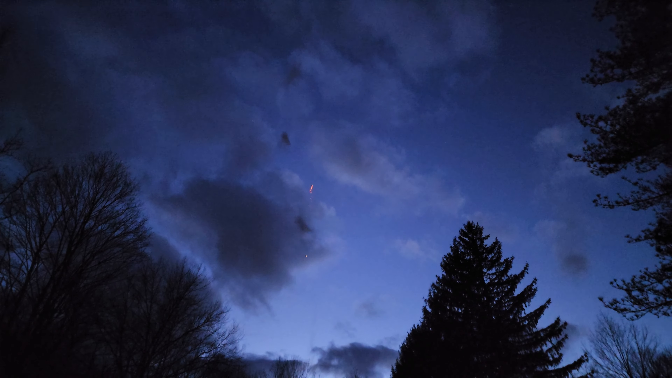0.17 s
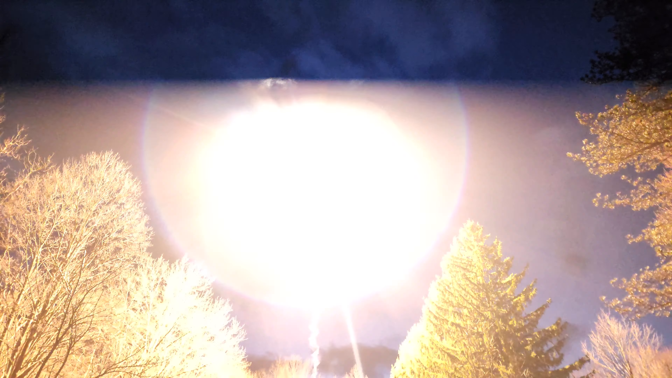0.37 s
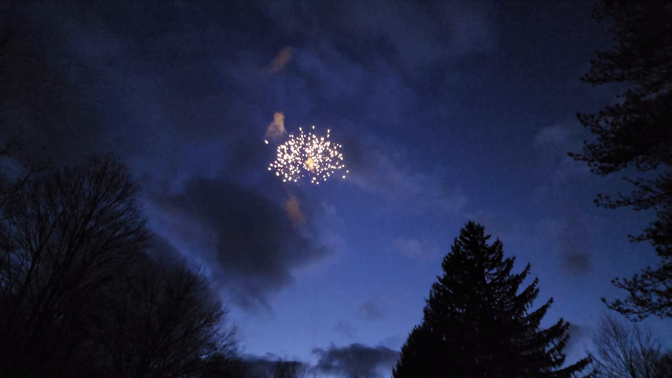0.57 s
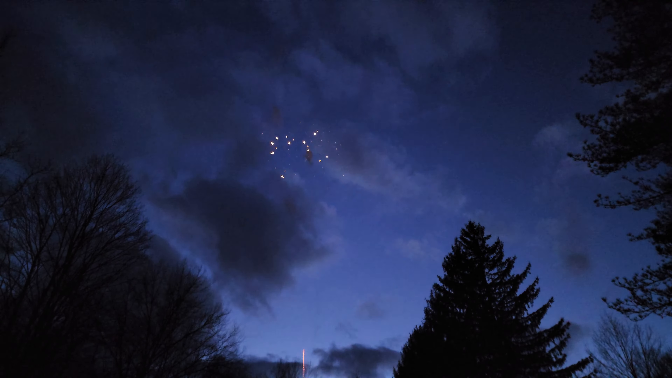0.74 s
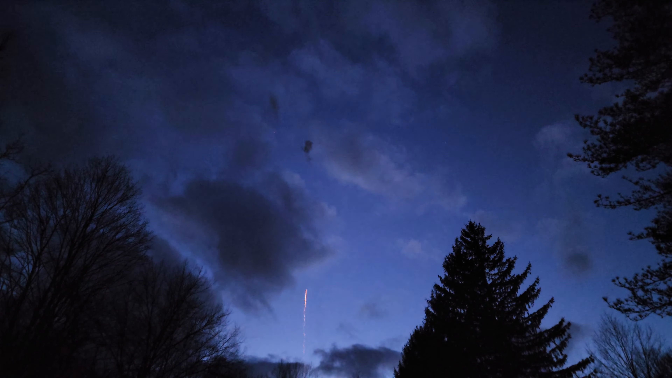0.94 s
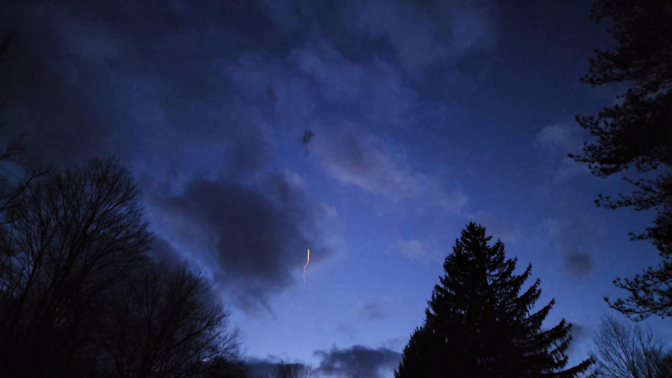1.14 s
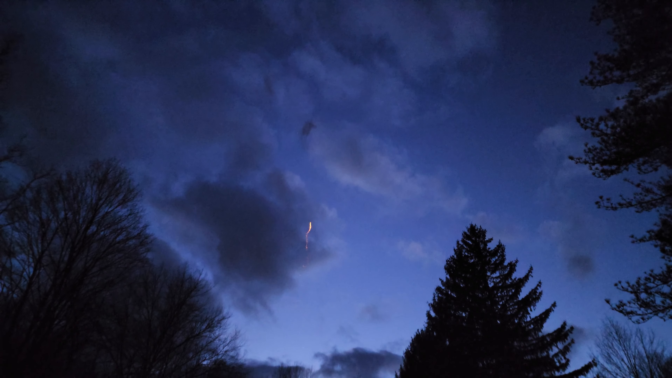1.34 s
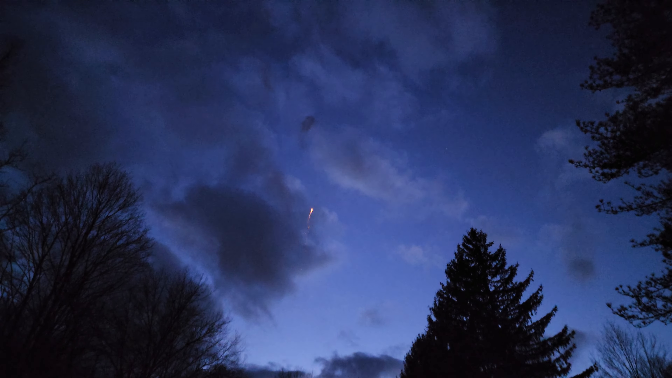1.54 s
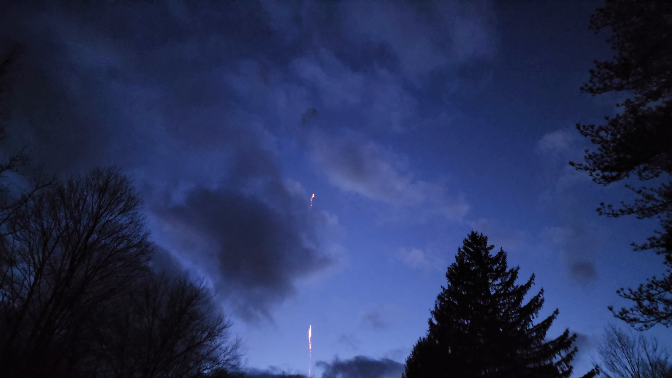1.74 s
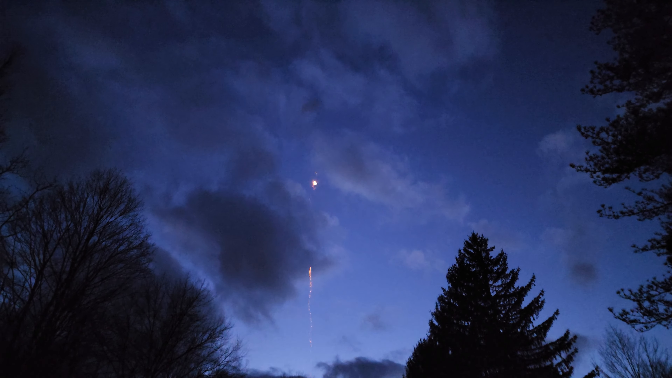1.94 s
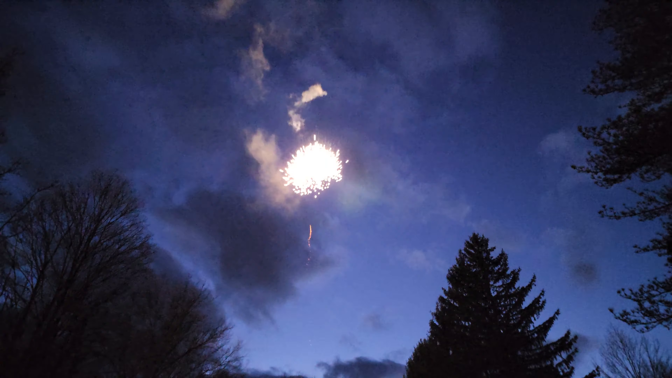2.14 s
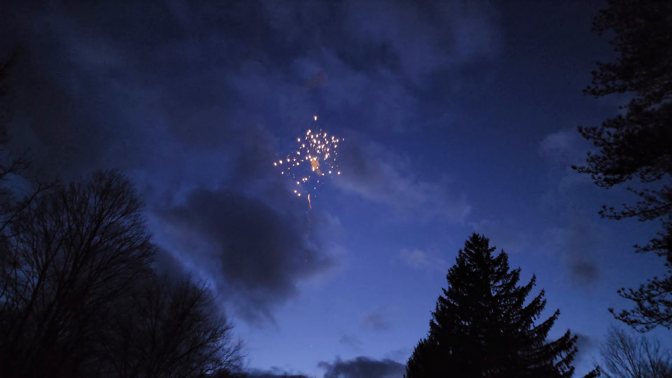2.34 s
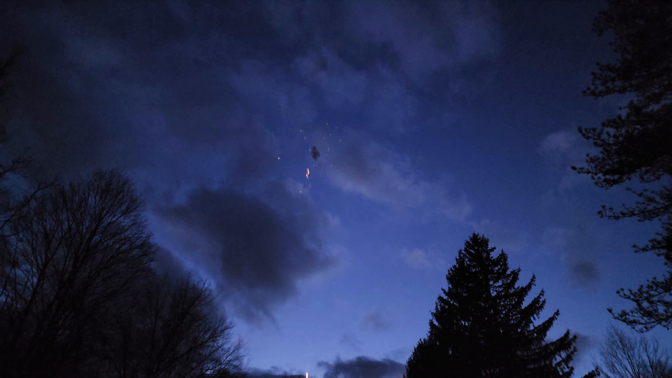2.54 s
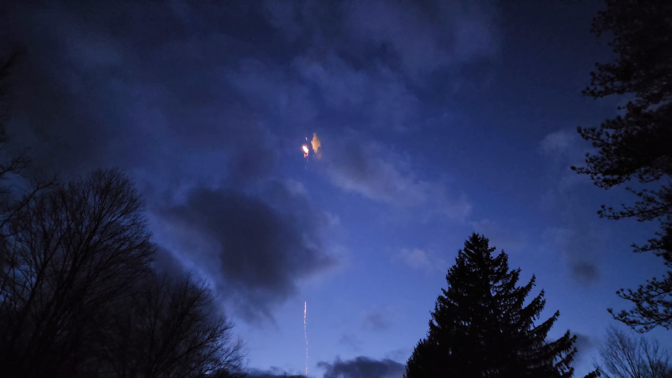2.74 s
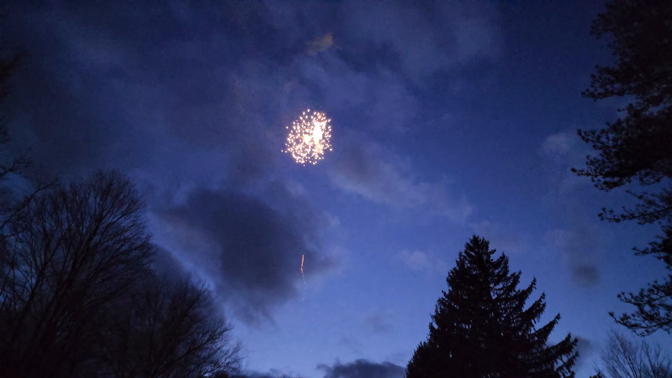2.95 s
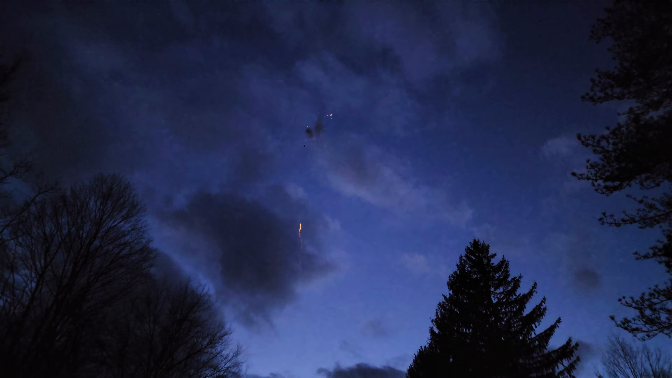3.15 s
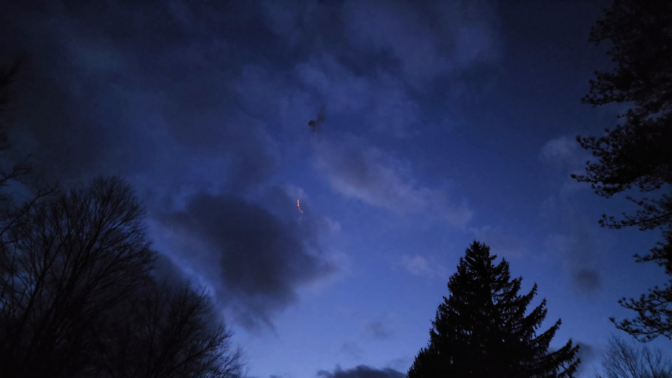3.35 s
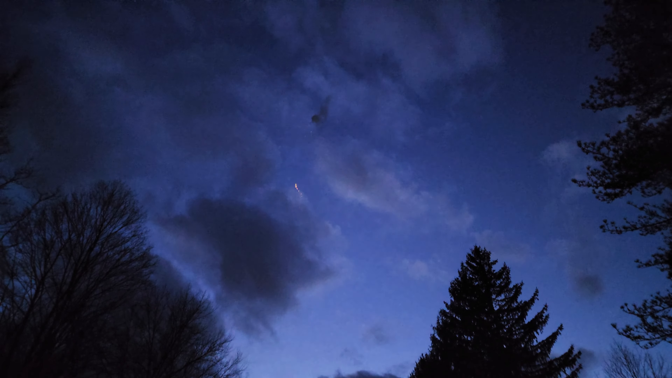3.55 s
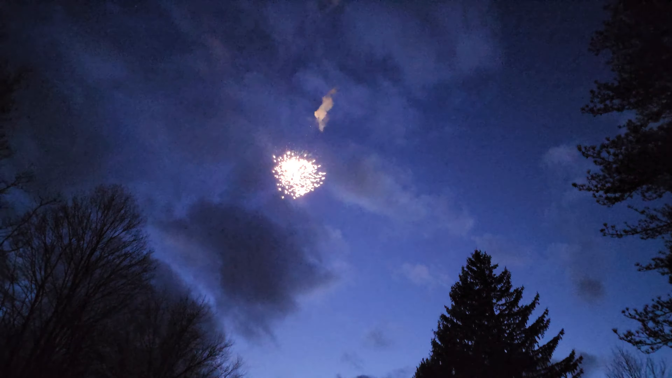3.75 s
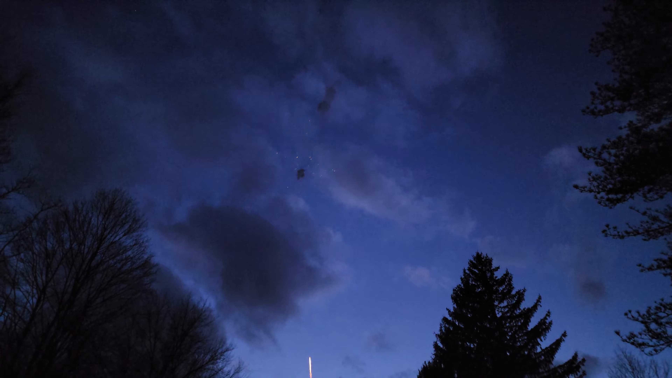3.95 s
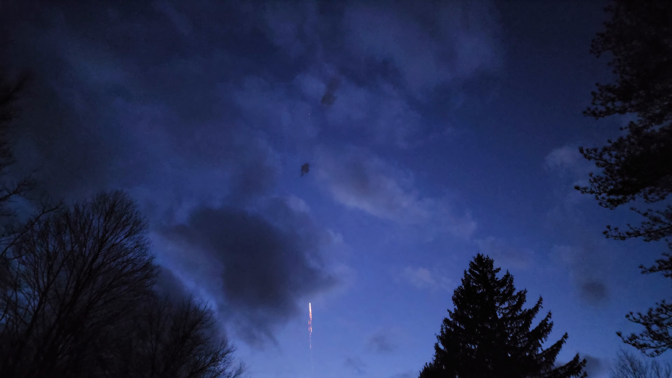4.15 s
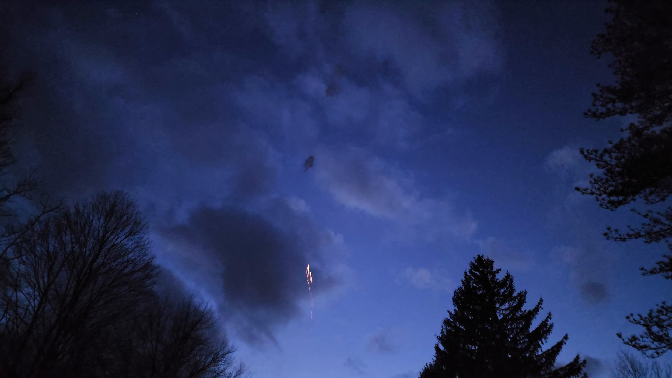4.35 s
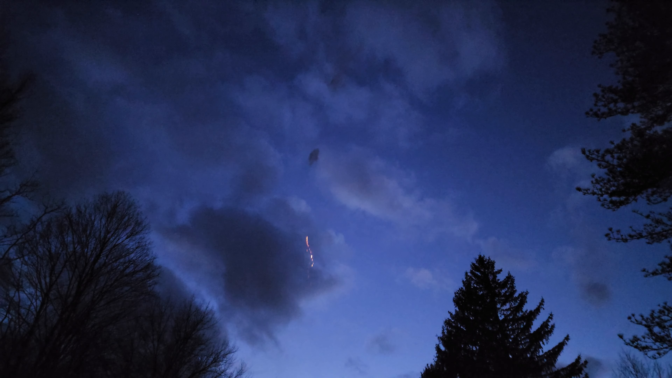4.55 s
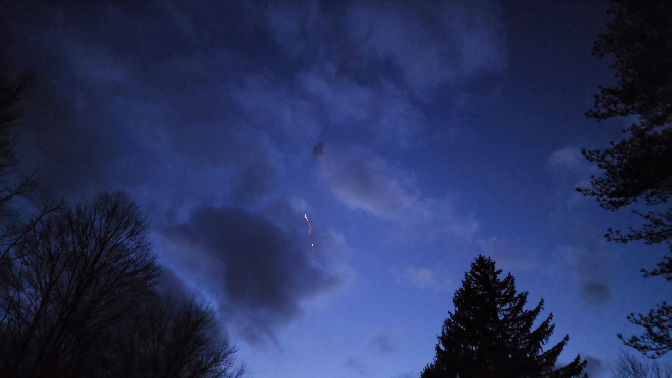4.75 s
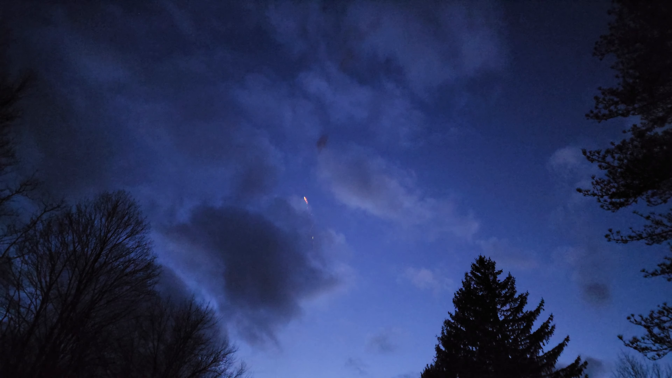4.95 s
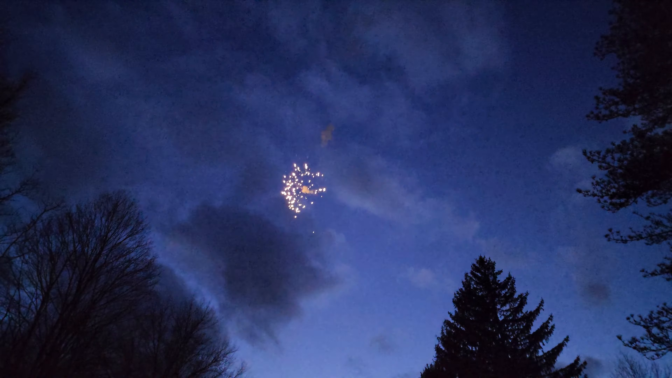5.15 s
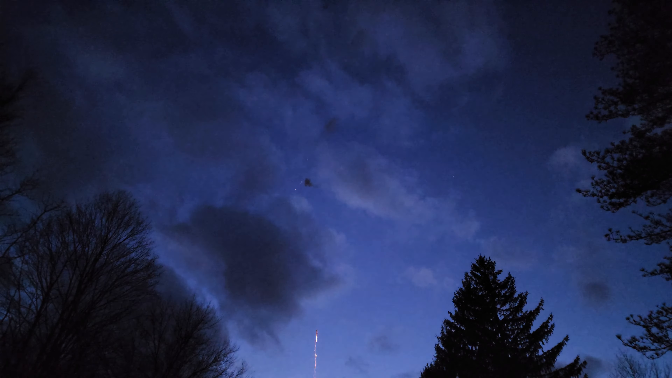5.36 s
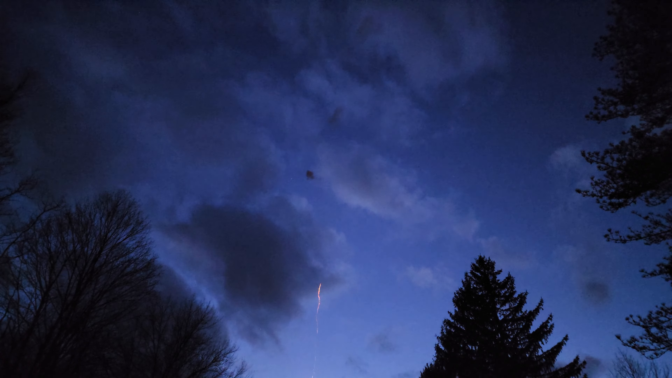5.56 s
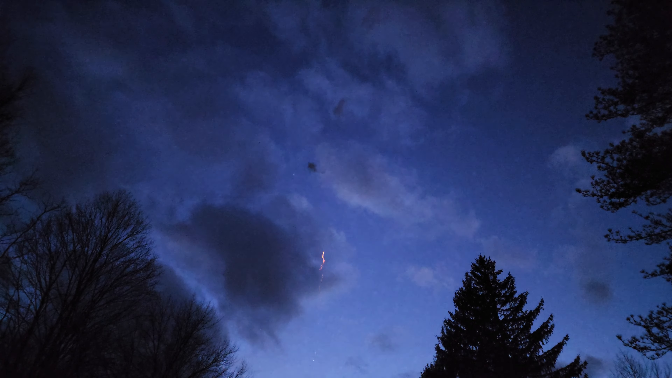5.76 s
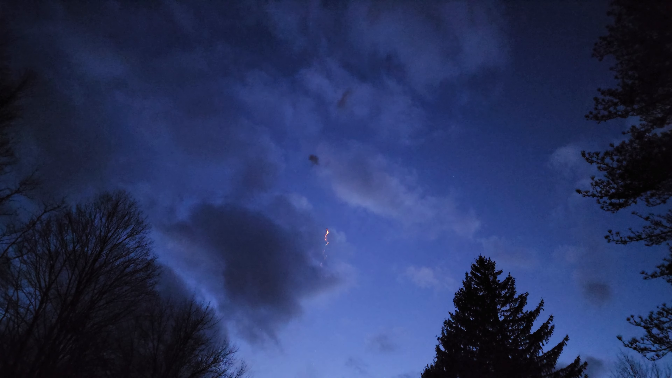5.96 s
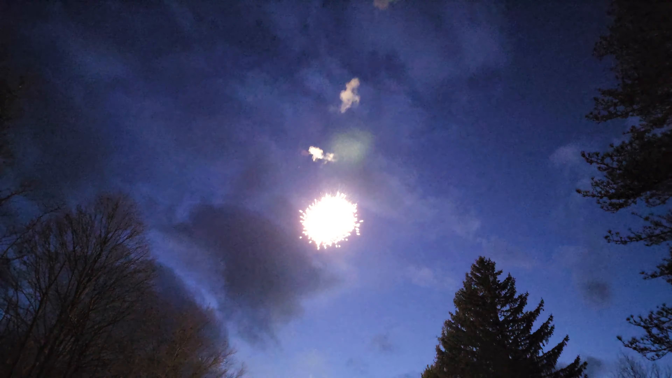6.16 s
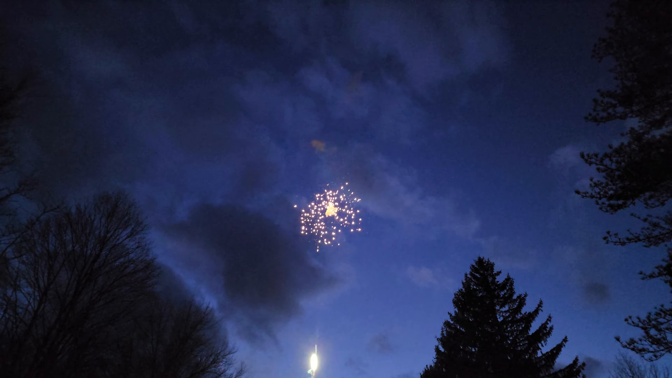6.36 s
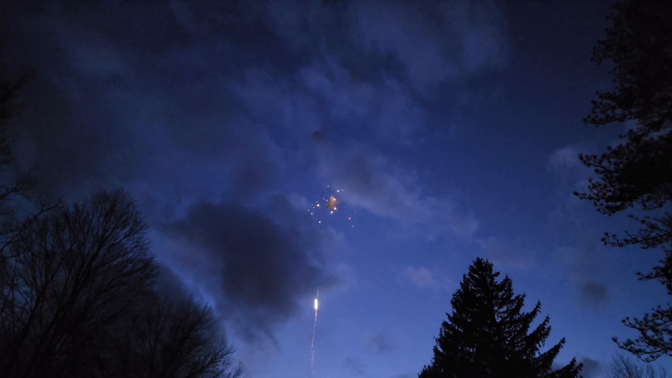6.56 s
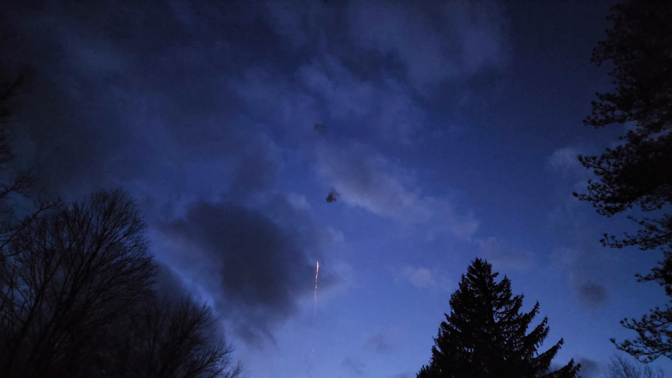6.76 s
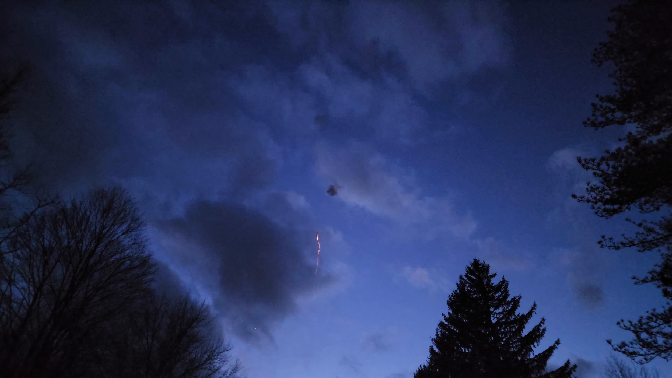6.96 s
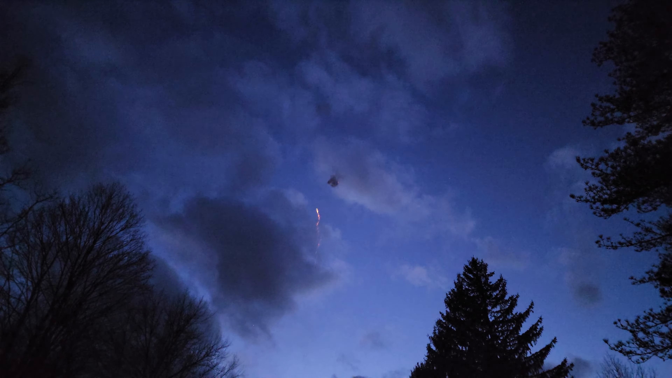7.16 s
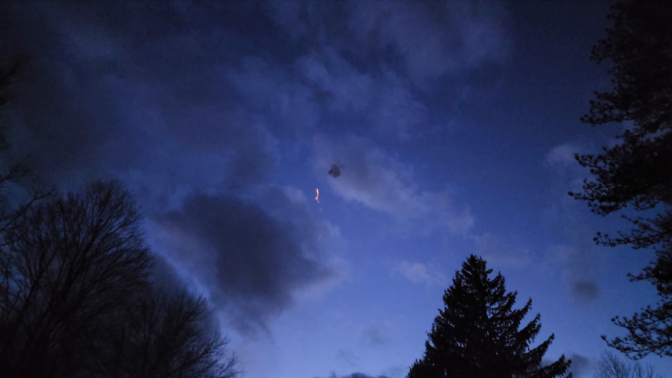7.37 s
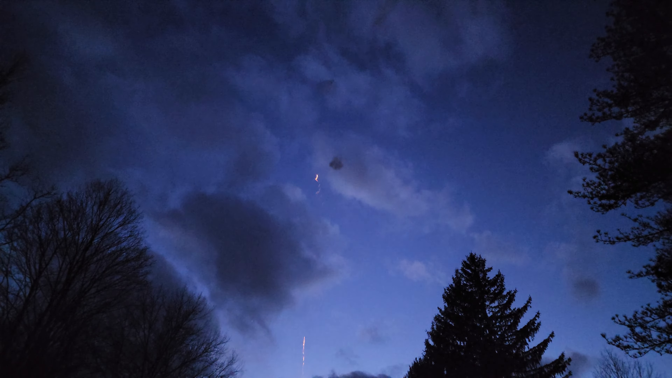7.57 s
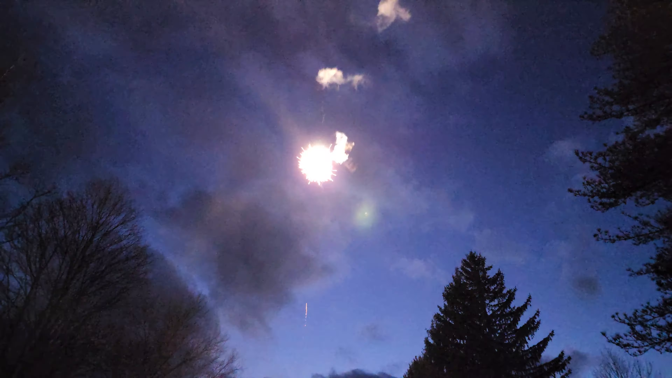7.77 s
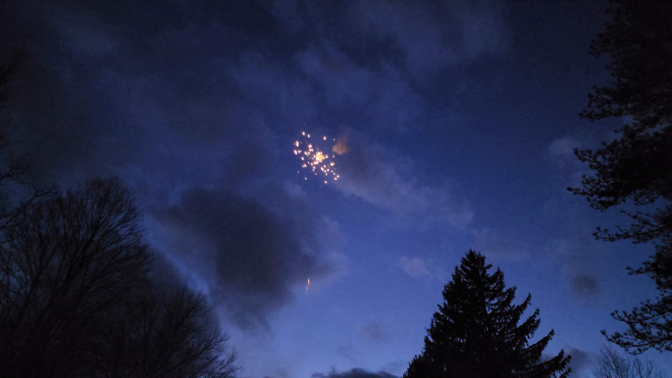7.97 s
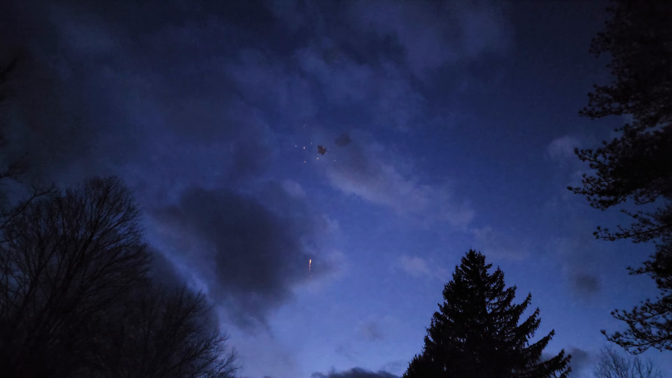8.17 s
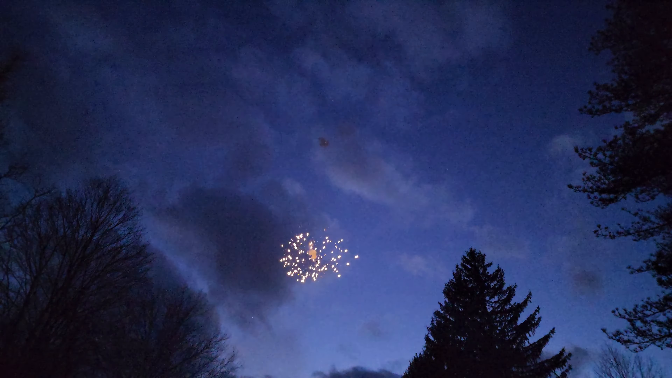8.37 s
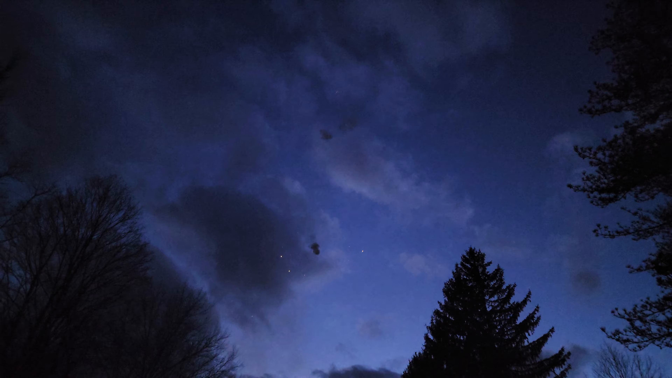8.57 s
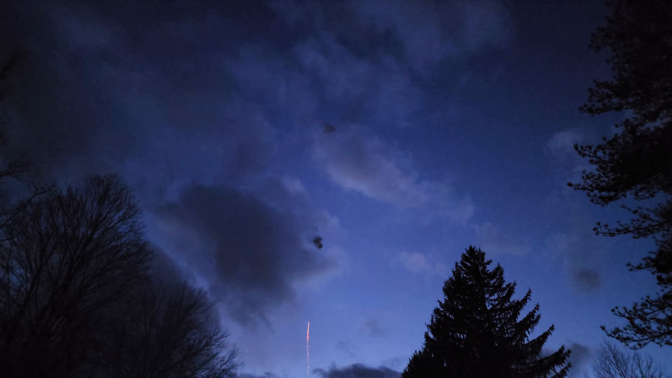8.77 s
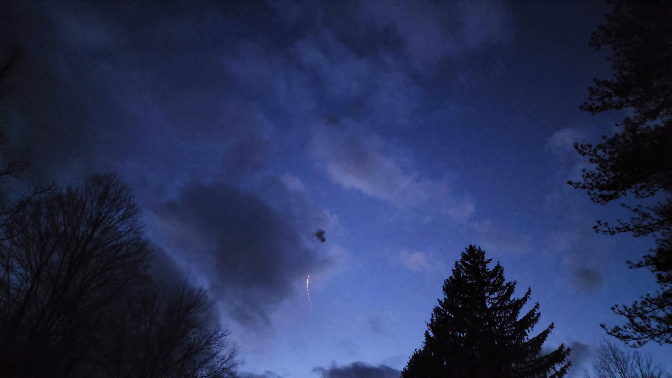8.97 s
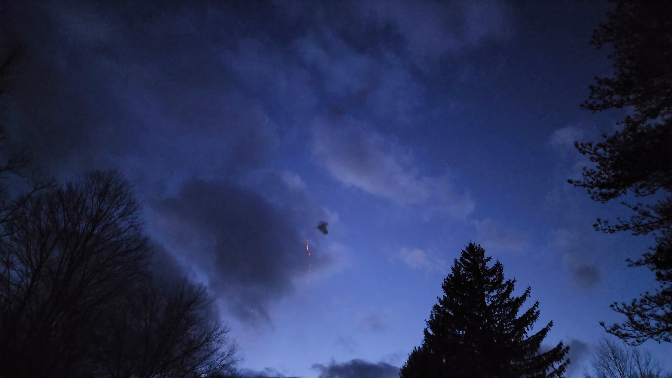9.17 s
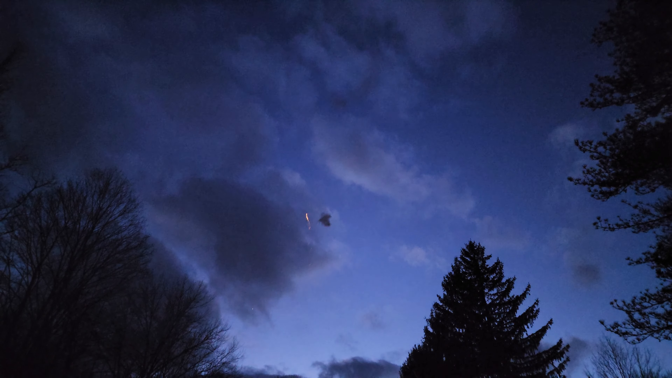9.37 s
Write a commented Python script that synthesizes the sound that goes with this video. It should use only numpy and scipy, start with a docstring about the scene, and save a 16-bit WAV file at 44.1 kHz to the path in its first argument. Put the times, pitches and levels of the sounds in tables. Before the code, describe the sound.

Fireworks burst outdoors in an uneven run of loud, cracking bangs, with hollow tube pops between them and rolling woodland echoes.

```python
"""A firework cake fires shell after shell in a wooded yard at dusk.
At first an earlier bang is still echoing. Then each shell leaves its tube with a hollow pop.
A moment later it bursts overhead: the sharp wave of air and its bounce off the ground overload
the microphone. Next the nearby trees scatter the shot back as a short rush of noise,
and last the woods hiss and the hills rumble on behind it."""
import sys
import numpy as np
from scipy import signal
from scipy.fft import rfft, irfft, next_fast_len
from scipy.io import wavfile
from scipy.ndimage import uniform_filter1d

SR = 44100
rng = np.random.default_rng(int(sys.argv[2]) if len(sys.argv) > 2 else 0)


def pcm_store(signal):
    """Save signal as 16-bit PCM."""
    levels = np.round(np.clip(np.atleast_2d(signal), -1, 1) * 32767)
    wavfile.write(sys.argv[1], SR, levels.astype(np.int16).T)


N = 415863
TIME = np.arange(N) / SR
STEP = 64   # samples between updates of slowly changing levels
CUTOFF_HZ = 16000
RIGHT_LAG_S = .00005   # the right side hears each shot this much later

# steady hush of the evening air: f/Hz, level/(dB per Hz)
EVENING_AIR = [(25, -101), (50, -89.5), (90, -74), (200, -73.5), (500, -84.5), (1400, -90), (2000, -93.5),
               (2700, -112), (4500, -119), (8000, -137), (16000, -142)]
# tone of the far rumble off the hills: f/Hz, level/(dB per Hz)
HILL_TONE = [(25, -89), (50, -75.5), (100, -66), (170, -60.5), (300, -67), (600, -108.5), (2000, -130)]
# tone of the echo from the trees: f/Hz, level/(dB per Hz)
TREE_TONE = [(30, -80.5), (100, -71), (200, -56.5), (370, -58.5), (700, -67), (1500, -70.5), (2050, -72.5),
             (2600, -83.5), (4400, -76), (6500, -83), (8500, -82), (10000, -91), (12000, -84),
             (16000, -94.5)]
# how fast air and leaves soak up an echo: f/Hz, loss/(dB per s)
AIR_AND_LEAF_LOSS = [(100, 1), (350, 5.5), (1500, -2), (2700, 10), (4300, 19.5), (7000, 50), (12000, 63)]
# tone of a launch's echo next to that of a burst: f/Hz, level/dB
LAUNCH_ECHO_TONE = [(100, -10), (300, -11), (600, -4), (1500, 0), (2700, -1), (4500, -1), (8000, -6),
                    (12000, -5.5)]
# how alike the echoes are in the left and right channels: f/Hz, likeness (-1 to 1)
STEREO_LIKENESS = [(60, 0.98), (130, 0.97), (290, 0.87), (640, 0.097), (1400, -0.2), (3000, 0.11),
                   (7000, -0.054)]
# the notes an empty tube rings at: f/Hz, Q (higher rings longer), level/dB
TUBE_NOTES = [(602, 2.88, 0), (1184, 4.4, -11.5), (1900, 7.4, -14.5)]
# ringing of the gas jet at the tube's mouth: f/Hz, Q, level/dB
JET_NOTES = [(4800, 4, -2), (7700, 5, 4), (12500, 3, 0)]
# charges that push the shells out of their tubes: t/s, pop level/dB, crack level/dB
LAUNCHES = [(0.5568, 7.5, -4), (1.475, 7, -6), (2.3927, 6.5, -7), (3.6596, 7.5, -8.5), (4.9899, 11.5, -4),
            (6.0736, 9, -5), (7.0118, 2.5, -18), (9.3252, 7.5, -4)]
# peaks and dips made by the microphone's sound holes: f/Hz, Q, level/dB
MIC_HOLES = [(1240, 0.86, 8.5), (2900, 6.2, 0.5), (4200, 1, 4.5), (8700, 3.8, 2.5), (10450, 11, -10.5),
             (11000, 2.5, 10)]
# shells bursting overhead: t/s, push length/ms, ground bounce delay/ms, bounce level/dB, echo level/dB
SHELL_BURSTS = [(-.55, 1.8, 5.2, 4, -0.5), (0.5845, 1.7, 5.5, 6.5, -2.5), (2.204, 1.22, 5.08, 7, 2.5),
                (2.9919, 1.75, 5.5, 3.5, -1), (3.8256, 1.8, 5.65, 7, -3), (5.1866, 1.7, 5.43, 3, 0),
                (6.2382, 2, 5.1, 4, -1.5), (7.9142, 2.43, 6.17, 3, 2.5), (8.3838, 1, 4.3, 7, -0.5)]


def from_db(db):
    """Turn decibels into a number to multiply a sound by."""
    return 10 ** (np.asarray(db) / 20)


def at_hz(points, hz):
    """Read between a table's rows, giving every octave the same room."""
    f, value = np.transpose(points)
    return np.interp(np.log(hz), np.log(f), value)


def delayed(x, s):
    """The same sound, s seconds later."""
    return np.pad(x, (int(round(s * SR)), 0))[:N]


def resonator(x, hz, q, high=0, band=0, low=0):
    """A filter that can ring: it mixes what lies above (high), around (band) and below (low) hz."""
    w = 2 * SR * np.tan(np.pi * hz / SR)
    b, a = signal.bilinear([high, band * w / q, low * w * w], [1, w / q, w * w], SR)
    return signal.lfilter(b, a, x + 1e-18)


def drift(rate_hz, size):
    """A smooth random wobble, typically of size 1, with one value every STEP samples."""
    r = np.exp(-2 * np.pi * rate_hz * STEP / SR)
    slow = signal.lfilter([1], [1, -2 * r, r * r], rng.standard_normal(2 * size))[size:]
    return slow / slow.std()


def echo_shape(age, db, rise_s, hold_s, fall):
    """An echo's power builds up, holds while the wave crosses the obstacles, then dies away."""
    age = np.maximum(age, 0)
    build_up = 1 - np.exp(-(age / rise_s) ** 2)
    return from_db(db) ** 2 * build_up / (1 + (age / hold_s) ** fall)


def tree_scatter(age, hz, branch_hz=390, edge_hz=810, edge_delay_s=.099, edge_width_s=.013):
    """Power the trees send back, age seconds after a shot: near branches, the wood's edge, its depths."""
    # thin branches let the low notes pass; the edge of the wood returns them as one dull slap
    branches = echo_shape(age, db=2.66, rise_s=.0058, hold_s=.094, fall=7.1) / (1 + (branch_hz / hz) ** 2)
    slap = np.exp(-((age - edge_delay_s) / edge_width_s) ** 2) * (age > 0)
    edge = from_db(2.5) ** 2 * slap / (1 + (hz / edge_hz) ** 2)
    depths = echo_shape(age, db=-4.5, rise_s=.026, hold_s=.42, fall=3.41)
    return branches + edge + depths


def echo_power(hz, t, launch_db=-10.5, launch_build_s=.03):
    """Power that trees and hills return from all the shots: a row per pitch, a column per moment."""
    def one_echo(age):
        """The echo of one shot, fading in air and leaves."""
        trees = from_db(at_hz(TREE_TONE, hz)) ** 2 * tree_scatter(age, hz)
        roll = echo_shape(age, db=-.5, rise_s=.18, hold_s=.93, fall=2.5)
        hills = from_db(at_hz(HILL_TONE, hz)) ** 2 * roll
        return (trees + hills) * from_db(-at_hz(AIR_AND_LEAF_LOSS, hz) * age) ** 2

    power = np.zeros((len(hz), len(t)))
    for s, *_, echo_db in SHELL_BURSTS:
        first = np.searchsorted(t, s)
        power[:, first:] += one_echo(t[first:] - s) * from_db(echo_db) ** 2
    for s, pop_db, crack_db in LAUNCHES:
        first = np.searchsorted(t, s)
        age = t[first:] - s
        gain = from_db(launch_db + (pop_db + crack_db) / 2 + at_hz(LAUNCH_ECHO_TONE, hz))
        build_up = 1 - np.exp(-age / launch_build_s)   # slower, because it starts on the ground
        power[:, first:] += one_echo(age) * (gain * build_up) ** 2
    return power


def woods(clump_db=.7, patchy_db=1.53, swell_db=2.5):
    """Countless small echoes blur into noise over the evening air; clumps of trees make it lumpy."""
    size, t = next_fast_len(N), TIME[::STEP]
    centres = np.geomspace(25, CUTOFF_HZ, 40)
    f = np.maximum(np.fft.rfftfreq(size, 1 / SR), 1)
    band_number = np.log(f / centres[0]) / np.log(centres[1] / centres[0])
    alike = np.clip(at_hz(STEREO_LIKENESS, f), -1, 1)
    shared, opposite = rfft(rng.standard_normal((2, size))) * np.sqrt(SR) / 2
    noise = np.sqrt(1 + alike) * shared + np.sqrt(1 - alike) * opposite * [[1], [-1]]
    clumps = clump_db * drift(78, len(t))
    swells = swell_db * drift(11.4, len(t))
    echoes = echo_power(centres[:, None], t)
    out = np.zeros((2, N))
    for k, hz in enumerate(centres):
        band = irfft(noise * np.maximum(1 - abs(band_number - k), 0), size)[:, :N]
        bass_swells = 2 * swells / (1 + hz / 300)
        lumps_db = clumps + patchy_db * drift(13, len(t)) + bass_swells
        power = echoes[k] * from_db(lumps_db) ** 2 + from_db(at_hz(EVENING_AIR, hz)) ** 2
        out += band * np.interp(TIME, t, np.sqrt(power))
    return out


def trunks(level_db=-5, spread_db=4, knock_hz=340, count=24):
    """Single big trunks throw back small, dull copies of each bang, each from its own side."""
    clicks = np.zeros((2, N))
    for s, *_, echo_db in SHELL_BURSTS:
        age = rng.uniform(.018, .63, count)
        side_lag_s = .0003 * rng.uniform(-1, 1, count)
        chance_db = spread_db * (2 * rng.random(count) - 2.5)
        gain = from_db(level_db + echo_db + chance_db) * np.sqrt(tree_scatter(age, knock_hz))
        for channel, sign in enumerate((1, -1)):
            at = ((s + age + sign * side_lag_s) * SR).astype(int)
            heard = (at >= 0) & (at < N)
            clicks[channel, at[heard]] += gain[heard]
    knocks = resonator(clicks, knock_hz, q=1.37, band=.93)
    return resonator(knocks, hz=2000, q=.9, low=.93)


def blast(s, push_ms, rise_ms):
    """An explosion's wave at s seconds: the air jumps, pushes briefly, then sucks back for longer."""
    out = np.zeros(N)
    near = slice(*np.searchsorted(TIME, [s, s + .03]))
    ms = (TIME[near] - s) * 1000
    out[near] = (1 - np.exp(-ms / rise_ms)) * (1 - ms / push_ms) * np.exp(-ms / push_ms)
    return out


def launches(right_db=2.4, jet_db=-18, wall_db=-22.5, wall_delay_s=.476):
    """A charge thumps the air in the tube, and gas cracks and spits out of its mouth."""
    push = sum(from_db(db) * blast(s, push_ms=1.3, rise_ms=.17) for s, db, _ in LAUNCHES)
    hollow = sum(from_db(db) * resonator(push, hz, q, band=q) for hz, q, db in TUBE_NOTES)
    hollow = from_db(-14) * resonator(hollow, hz=129, q=.46, high=.85)
    # the tube passes only its lowest notes, which leaves a gap below the bright snap
    hollow = signal.sosfilt(signal.butter(4, 1750, fs=SR, output="sos"), hollow)
    crack = sum(from_db(db) * blast(s, push_ms=.35, rise_ms=.03) for s, _, db in LAUNCHES)
    jet = from_db(jet_db) * resonator(abs(crack), hz=250, q=.32, low=4.1) * rng.standard_normal(N)
    snap = resonator(crack + jet, hz=4200, q=1.5, high=1)
    pop = hollow + sum(from_db(db) * resonator(snap, hz, q, band=.86) for hz, q, db in JET_NOTES)
    # a far wall returns each pop once, duller
    pop += from_db(wall_db) * delayed(resonator(pop, hz=2500, q=.7, low=.83), wall_delay_s)
    return np.array([pop, from_db(right_db) * delayed(pop, RIGHT_LAG_S)])


def mic_holes(x):
    """The microphone's sound holes ring at high pitches."""
    for hz, q, db in MIC_HOLES:
        x = resonator(x, hz, q * from_db(db / 2), high=.99, band=from_db(db), low=.95)
    return x


def bursts(shock_db=10, ceiling=1.704, ragged=.087, thump_hz=130, thump_db=3, low_cut_hz=305):
    """Shells of equal charge burst; each wave and its ground bounce overload the microphone."""
    air = np.zeros(N)
    for s, push_ms, delay_ms, bounce_db, _ in SHELL_BURSTS:
        air += from_db(shock_db) * blast(s, push_ms, rise_ms=.035)
        air += from_db(bounce_db) * blast(s + delay_ms / 1000, push_ms, rise_ms=.05)
    air = np.array([air, delayed(air, RIGHT_LAG_S)])
    # above the ceiling, the left side squashes the peaks and the right side folds them back down
    lost = np.array([[.6], [2.4]]) * np.maximum(air - ceiling, 0)
    air -= lost
    # the device's body and the rough ground break up the wave behind its front
    grit = resonator(rng.standard_normal((2, N)), hz=4530, q=.37, low=2.1)
    air += ragged * uniform_filter1d(abs(air), size=40) * grit
    bang = mic_holes(resonator(air, low_cut_hz, q=1.25, high=1))
    # only the push overloads, which kicks the microphone off balance: a deep thump
    kick = resonator(-lost, thump_hz, q=.7, low=1)
    thump = from_db(thump_db) * resonator(kick, hz=27.7, q=.33, high=1)
    return bang + thump


def scene():
    """Bursts above, tubes ahead, woods all round."""
    return bursts() + launches() + trunks() + woods()


def record(dry, top=.77):
    """The loudest peaks are squashed, and the very highest pitches are cut."""
    squashed = top * np.tanh(dry / top)
    return signal.sosfilt(signal.ellip(10, .1, 80, CUTOFF_HZ, fs=SR, output="sos"), squashed)


dry = scene()
out = record(dry)
pcm_store(out)
```